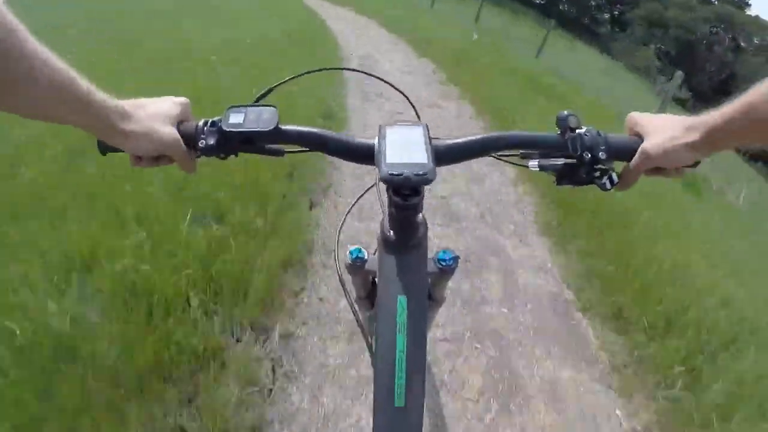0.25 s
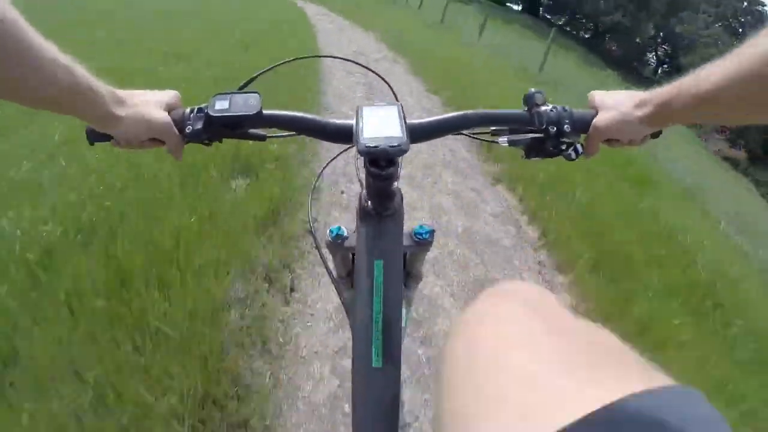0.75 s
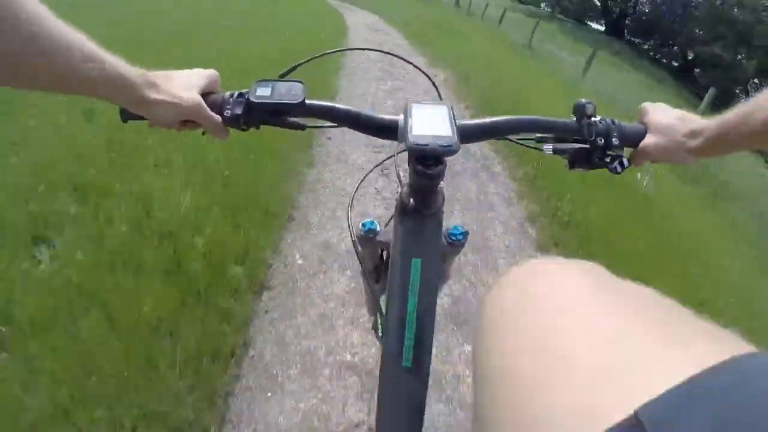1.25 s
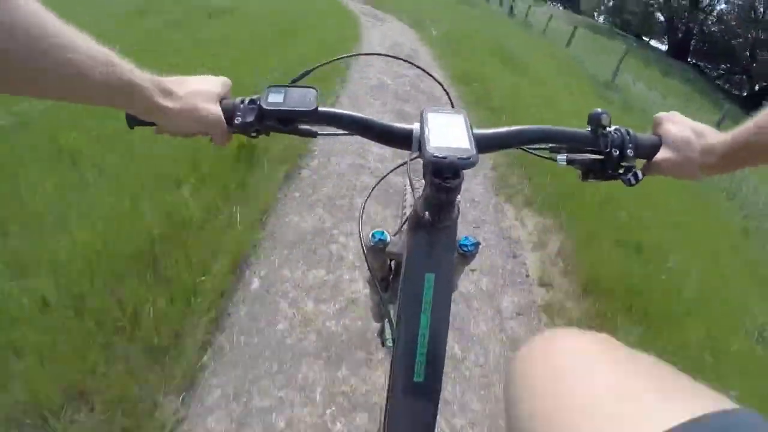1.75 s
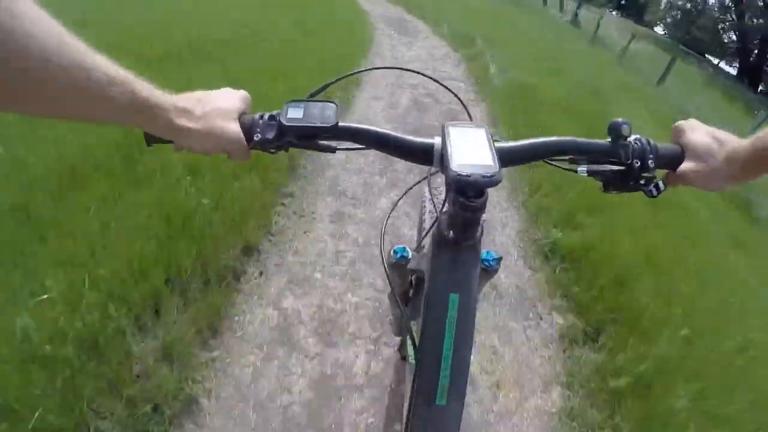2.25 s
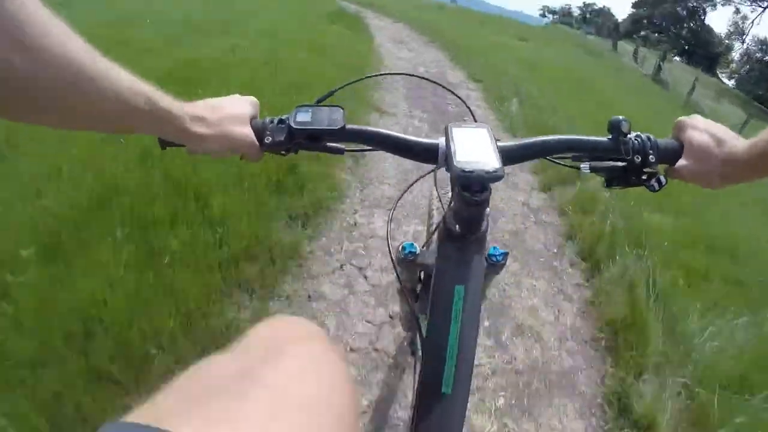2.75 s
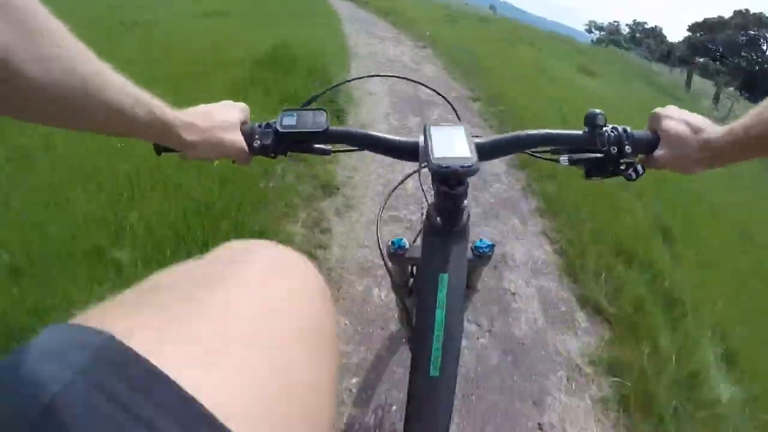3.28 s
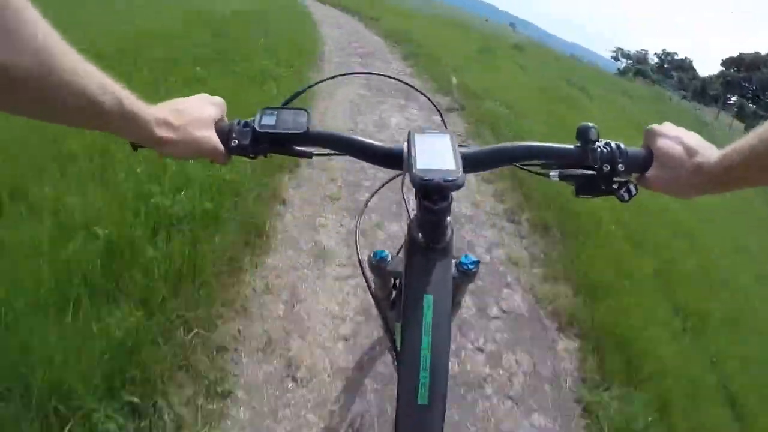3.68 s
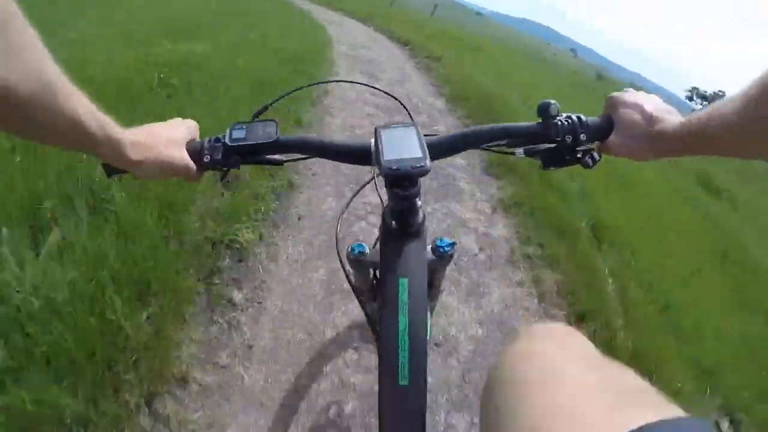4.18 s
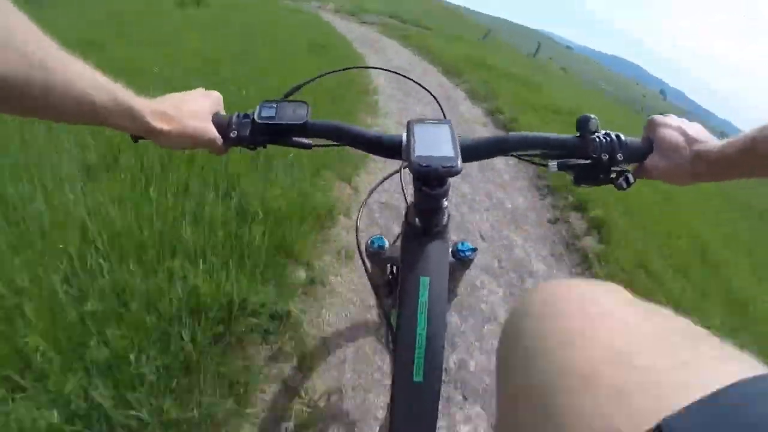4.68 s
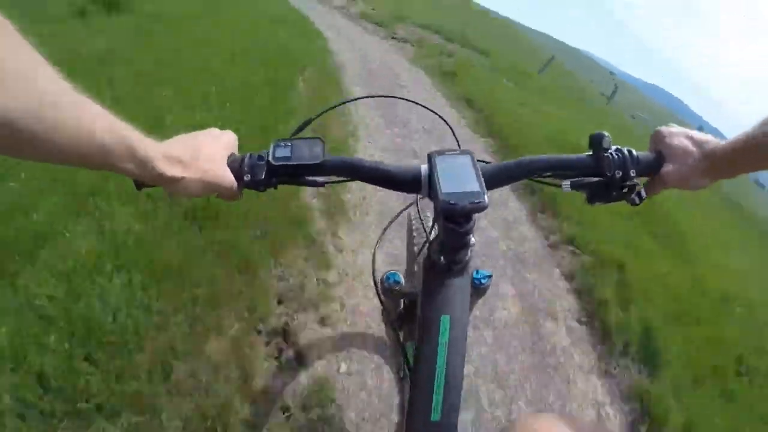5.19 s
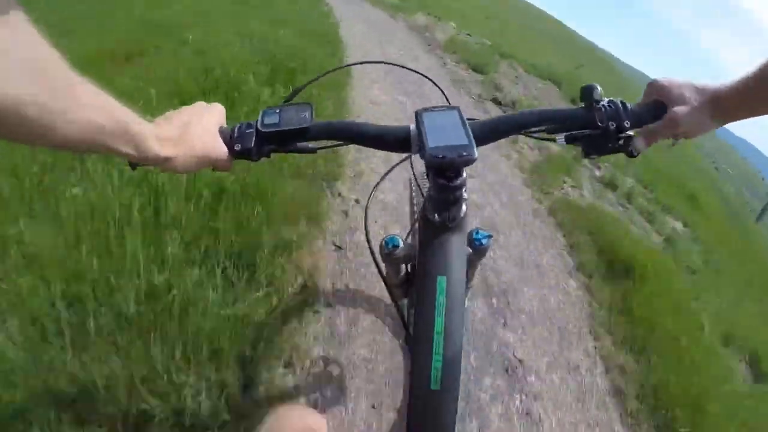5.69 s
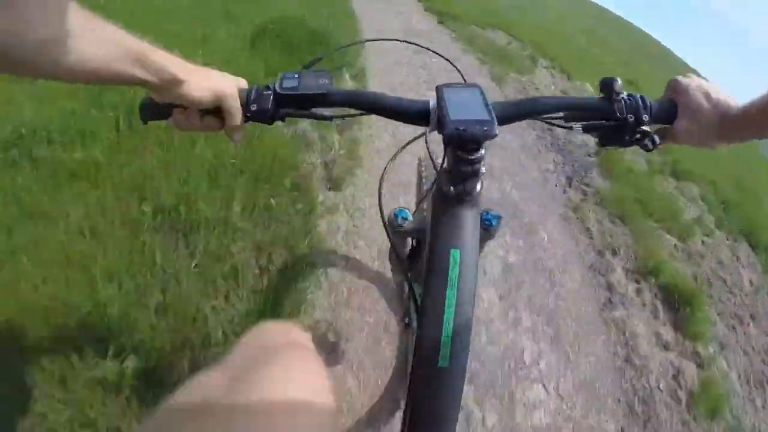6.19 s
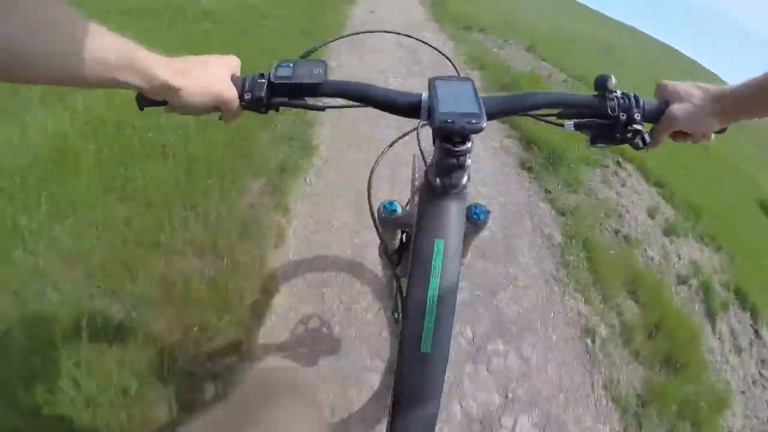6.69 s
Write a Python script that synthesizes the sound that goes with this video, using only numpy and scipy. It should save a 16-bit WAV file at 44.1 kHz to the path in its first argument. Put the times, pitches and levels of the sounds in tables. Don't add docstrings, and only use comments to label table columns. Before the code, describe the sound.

A mountain bike rolls over a gritty gravel trail, tyres crunching and stones knocking the frame while a chest-worn camera thumps and rumbles.

```python
import sys
import numpy as np
from scipy import signal
from scipy.fft import rfft, irfft, next_fast_len
from scipy.io import wavfile
from scipy.ndimage import uniform_filter1d

SR = 44100
rng = np.random.default_rng(int(sys.argv[2]) if len(sys.argv) > 2 else 0)


def volts_from_decibels(level):
    exponent = np.asarray(level, float) / 20
    return 10 ** exponent


def generate_wav(signal):
    frames = np.transpose(np.atleast_2d(signal))
    scaled = np.clip(frames, -1, 1) * 32767
    pcm = np.round(scaled).astype(np.int16)
    wavfile.write(sys.argv[1], SR, pcm)


N = 306048

# centre_s, level_db
CHIRPS = [(0.094, -75), (0.336, -73), (0.543, -73), (0.734, -73), (0.944, -76), (1.178, -74), (1.389, -74),
          (1.568, -71), (1.778, -72), (1.962, -76), (2.179, -71), (2.414, -74), (2.619, -74.5),
          (2.805, -75), (3.028, -84), (3.238, -74), (3.415, -72), (3.655, -71), (3.875, -72), (4.038, -72),
          (4.172, -77), (4.29, -72), (4.471, -71), (4.715, -70), (4.942, -74), (6.014, -78), (6.198, -78),
          (6.391, -71), (6.545, -72), (6.77, -75)]
CHIRP_HZ, CHIRP_S = 10580, .027
# centre_s, length_s, pitch_hz, level_db
NEAR_BUZZ = [
    (6.152, .05, 10020, -72),
    (6.152, .05, 10590, -73),
]
# pitch_hz, level_db (per Hz)
AIR_COLOUR = [(180, -48), (300, 1.5), (515, -15.5), (790, 0.5), (994, -13.5), (1470, -2.5), (2010, -7.5),
              (2450, -5), (3400, -20.5), (5940, -19), (7350, -27), (12200, -36), (14000, -60)]
AIR_DB = -51
# pitch_hz, level_db (per Hz)
MIC_HISS = [(6000, -30), (10000, -7), (13000, 0), (15200, -10)]
MIC_HISS_DB = -82.5
# pitch_hz, level_db (per Hz)
WOBBLE = [(4, 0), (8, 0.5), (16, 7), (28, 8.5), (40, -8), (70, -18.5), (140, -22), (300, -48), (700, -140)]
# centre_s, peak_db, half_length_s
LURCHES = [(0.05, -31, 0.064), (0.203, -29.5, 0.15), (0.283, -21, 0.044), (0.475, -19, 0.016),
           (0.613, -23, 0.084), (0.835, -25.5, 0.18), (1.287, -17.5, 0.037), (1.476, -20.5, 0.026),
           (1.791, -23, 0.031), (2.023, -23, 0.034), (2.232, -21.5, 0.086), (2.476, -24.5, 0.12),
           (2.96, -25.5, 0.19), (3.277, -19.5, 0.026), (3.728, -26.5, 0.33), (4.224, -16, 0.024),
           (4.47, -26, 0.11), (4.685, -21, 0.024), (4.945, -27.5, 0.2), (5.393, -27.5, 0.15),
           (5.422, -19.5, 0.023), (0.35, -28, 0.031), (2.471, -17, 0.016), (3.91, -39, 0.03),
           (6.033, -25.5, 0.02), (5.654, -25, 0.019), (5.776, -23, 0.025), (6.246, -26, 0.14),
           (6.541, -18, 0.03), (6.734, -25.5, 0.071)]
CALM_DB = -33.5
# centre_s, peak_db, direction (+1 outwards, -1 inwards)
THUMPS = [(0.314, -20, -1), (0.639, -20.5, 1), (0.963, -16.5, -1), (1.309, -17.5, -1), (1.632, -17, -1),
          (1.947, -20, -1), (2.284, -23.5, 1), (2.611, -18, 1), (2.935, -19, -1), (3.261, -16, -1),
          (3.588, -16.5, 1), (3.924, -31, -1), (4.25, -17, -1), (4.574, -19.5, -1), (4.902, -15.5, -1),
          (5.236, -19.5, 1), (5.557, -16, 1), (5.882, -18, -1), (6.215, -19, 1), (6.543, -23, 1),
          (6.868, -19.5, -1)]
# pitch_hz, width_hz, peak_db
THUD = [(110, 55, 0), (170, 80, -4), (225, 100, -9), (370, 90, -12)]
KNOCK = [(575, 85, -12.5), (647, 190, -10), (760, 70, 3.5), (890, 126, -12.5)]
CRACK = [(1470, 170, 0), (1670, 200, -5), (2220, 200, -3), (2480, 220, -3), (2980, 220, -18)]
TICK = [(3480, 1100, -4.5), (4197, 183, 0), (4630, 280, -0.5), (5600, 270, -8), (5910, 290, -2),
        (6570, 290, -11.5), (7800, 300, -14.5)]
SPARKLE = [(8950, 170, 0), (10200, 900, -10), (11700, 300, -4), (12750, 250, -7), (13500, 350, -14),
           (14900, 400, -15)]
GROUPS = [THUD, KNOCK, CRACK, TICK, SPARKLE]
# pitch_hz, width_hz, peak_db
CHIP_TOP = [(10680, 300, -1.5), (16400, 700, -14)]
# pitch_hz, width_hz, peak_db
LOOSE_THUD = [(109, 40, 1), (172, 64, -3), (230, 56, -8.5), (381, 106, -7.5)]
LOOSE_KNOCK = [(600, 330, -2.5), (817, 138, -1.5), (995, 160, -6.5)]
LOOSE_CRACK = [(1511, 167, 3), (1590, 224, -7), (2223, 160, -2), (2517, 91, -4), (3050, 67, -13.5)]
LOOSE_TICK = [(3460, 640, -8.5), (4130, 420, -8), (4486, 420, 1), (5620, 89, -4), (6000, 140, -5),
              (6530, 320, -18), (7200, 240, -18)]
# pitch_hz, width_hz, peak_db
HARD_CHIP = [(2300, 130, -3), (2550, 160, -6), (3250, 1300, -20), (4120, 240, -2.5), (4550, 700, -5),
             (6000, 390, -6.5), (6410, 290, -4), (7700, 450, -7.5), (9090, 270, -11.5), (10300, 1000, -25),
             (11750, 360, -20), (12700, 370, -19.5), (14500, 500, -24), (15600, 800, -28)]
CENTRES_HZ = [130, 700, 2000, 5200, 11000]
USUAL_DB = [-40, -52, -43, -48, -69]
# contact_ms, grains_per_s, size_spread_db, clumping_db, grit_level_db
CONTACT = [(0.087, 300, 2, 4, 5), (1, 100, 0.5, -2, -9), (1.4, 800, 4, 5, -3), (1.3, 500, 4, 5, -1),
           (1.7, 400, -1, -6, -51)]
# time_s, level_db
LOOSENESS = [(0.0, -51), (0.41, -51), (0.71, -52.5), (1.31, -50), (1.57, -52.5), (1.78, -52), (2.13, -50.5),
             (2.68, -51), (2.82, -53), (3.17, -51), (3.67, -53), (4.14, -50.5), (4.46, -52.5),
             (4.95, -51.5), (5.84, -50), (6.24, -52), (6.51, -50), (6.94, -51)]
# mean_db, looseness_share, lurch_share
ROLL = [(-48.5, 0.063, 0.027), (-53.5, 1.14, 0.12), (-64.5, 0.56, 0.34), (0.85, 1, 0.043)]
# start_s, thud_db
JOLTS = [(0.261, -25.5), (0.284, -21), (0.854, -31), (1.004, -24), (1.026, -30.5), (1.488, -27),
         (1.616, -24.5), (1.768, -31), (1.977, -24), (2.047, -26), (2.496, -20.5), (2.548, -27),
         (2.601, -21), (2.958, -26), (3.031, -24), (3.298, -25), (3.499, -28), (3.837, -27), (3.973, -23),
         (4.698, -21.5), (4.798, -24), (4.839, -23), (5.566, -26.5), (5.706, -22.5), (5.905, -24),
         (5.976, -20.5), (6.438, -22), (6.56, -19.5), (6.722, -27), (6.822, -23)]
# start_s, length_s, level_db
SCRAPES = [(0.199, 0.041, -46.5), (1.425, 0.032, -51), (2.616, 0.031, -43.5), (2.668, 0.043, -47),
           (2.727, 0.037, -47.5), (3.407, 0.038, -50), (3.654, 0.028, -45), (4.453, 0.073, -49),
           (4.649, 0.12, -46), (5.178, 0.034, -51), (5.342, 0.026, -48), (6.011, 0.03, -44.5),
           (6.25, 0.051, -50), (6.563, 0.046, -45.5), (6.761, 0.023, -45)]
# start_s, peak_db
PEBBLE_LOWS = [(0.12, -40), (0.261, -28), (1.169, -33), (1.488, -39), (1.713, -34), (2.046, -39),
               (2.178, -48), (2.261, -36), (2.321, -33), (2.421, -33), (2.567, -34), (2.613, -45),
               (3.223, -43), (4.322, -42), (4.576, -35), (5.091, -28.5), (5.198, -34), (5.345, -40),
               (5.878, -34), (5.974, -31), (6.103, -49), (6.268, -47), (6.329, -32), (6.512, -28),
               (6.819, -35), (6.867, -22)]
PEBBLE_KNOCKS = [(0.32, -39), (0.886, -40), (1.02, -39), (1.076, -35), (1.202, -39), (1.506, -38),
                 (1.979, -46), (2.047, -45), (2.155, -53), (2.423, -37), (2.481, -35), (2.872, -40),
                 (3.11, -51), (3.932, -40), (3.97, -39), (3.995, -40), (4.09, -48), (4.212, -36),
                 (4.577, -42), (4.918, -43), (5.091, -62), (5.255, -38), (5.341, -46), (5.517, -37),
                 (5.755, -41), (5.907, -42), (6.512, -39), (6.562, -39), (6.785, -45), (6.866, -38)]
PEBBLE_CRACKS = [(0.042, -43), (0.053, -41), (0.14, -39), (0.176, -35), (0.267, -43), (0.277, -38),
                 (0.317, -43), (0.611, -42), (0.767, -41), (0.798, -41), (1.039, -35), (1.101, -37),
                 (1.336, -48), (1.798, -45), (2.046, -43), (2.099, -39), (2.168, -34), (2.561, -42),
                 (3.106, -43), (3.564, -50), (3.665, -36), (3.702, -36), (4.106, -43), (4.2, -39),
                 (4.393, -47), (4.728, -43), (4.931, -44), (5.244, -33), (5.275, -43), (5.355, -36.5),
                 (5.508, -39), (5.574, -34), (5.642, -49), (5.663, -31), (5.761, -41), (5.886, -35),
                 (6.669, -44), (6.791, -43), (6.867, -58), (6.922, -41)]
# start_s, crack_db, tick_db
CHIPS = [(0.04, -52, -51), (0.14, -43, -43), (0.174, -44, -38.5), (0.181, -48, -52), (0.268, -39, -49),
         (0.535, -35, -45), (0.767, -44, -53), (0.803, -36, -53), (0.958, -46, -42), (1.156, -51, -43),
         (1.19, -35, -37), (1.209, -38, -38), (1.284, -32, -40), (1.447, -49, -44), (1.514, -48, -58),
         (1.525, -37, -52), (1.86, -46, -53), (1.967, -52, -57), (2.245, -35, -58), (2.344, -39, -45),
         (2.51, -51, -48), (2.603, -38, -43), (2.763, -39, -59), (2.989, -53, -44), (3.047, -49, -49),
         (3.103, -51, -50), (3.229, -33, -50), (3.394, -41, -59), (3.553, -47, -53), (3.861, -46, -46),
         (3.992, -38, -54), (4.31, -47, -47), (4.469, -37, -47), (4.601, -49, -49), (4.655, -36.5, -50),
         (4.928, -52, -47), (5.157, -43, -63), (5.277, -40, -46), (5.437, -55, -59), (5.757, -35, -43),
         (5.779, -47, -47), (5.785, -39, -46), (6.051, -56, -42), (6.198, -48, -53), (6.333, -51, -43),
         (6.438, -43, -37.5), (6.558, -48, -44), (6.697, -48, -43.5)]
# start_s, thud_db, knock_db, crack_db
BURIED = [(0.197, -22.5, -44, -79), (0.791, -20, -36, -44), (1.627, -20, -32, -38), (1.91, -18.5, -35, -41),
          (1.959, -22.5, -36, -35.5), (2.567, -30, -39.5, -43), (2.63, -57, -38, -39),
          (3.556, -26, -38, -42), (3.655, -20.5, -50, -64), (3.695, -25, -43.5, -50),
          (3.768, -17.5, -38.5, -41), (3.816, -21, -43, -47), (3.9194, -12.5, -30.5, -33),
          (4.471, -24, -46, -41), (4.512, -36, -43, -44), (4.677, -31, -37.5, -36.5),
          (4.717, -29, -40, -37.5), (4.843, -31, -38, -36), (4.919, -23, -39, -41), (5.393, -29, -43, -45),
          (5.474, -27, -41.5, -46), (5.642, -15.5, -31.5, -39), (5.686, -28, -41, -39),
          (5.729, -24.5, -42, -42), (6.031, -44, -46, -52), (6.329, -33, -39, -41),
          (6.663, -25.5, -42, -58), (6.771, -31, -38, -43), (6.867, -35, -45, -65), (6.935, -30, -34, -34)]
# start_s, knock_db, crack_db, tick_db
LOOSE = [(0.168, -89, -42, -40.5), (0.3, -85, -65, -41.5), (0.47, -68, -41, -42), (0.621, -38.5, -32, -41),
         (0.886, -53, -38.5, -60), (0.911, -34.5, -28.5, -48), (1.052, -38, -20.5, -29.5),
         (1.524, -64, -41.5, -52), (1.866, -34, -26, -42.5), (2.189, -68, -40.5, -42),
         (2.324, -42.5, -42, -52), (2.497, -45, -39.5, -36), (2.755, -28.5, -17, -26.5),
         (2.873, -47.5, -39, -51), (3.015, -67, -41, -44), (3.111, -64, -40.5, -50), (3.229, -48, -46, -50),
         (3.355, -33.5, -26, -39.5), (3.64, -61, -43, -35.5), (3.676, -47, -40, -47),
         (3.724, -55, -39.5, -43.5), (3.939, -63, -37, -44), (4.484, -45, -36, -39),
         (5.236, -36, -30, -36.5), (5.655, -38, -61, -36.5), (5.766, -43, -45, -50),
         (5.958, -67, -42, -37.5), (6.429, -45, -44, -34.5), (6.676, -41.5, -36, -85),
         (6.787, -47, -50, -53)]
# start_s, tilt_db (per octave)
LOOSE_TILT = [
    (.623, -4),
    (1.052, 7.5),
    (1.865, -8),
    (2.755, -8),
    (3.355, -1),
    (6.677, -12),
    (1.524, 13),
]
# start_s, crack_db, tick_db, sparkle_db
FLUNG = [(.489, -43, -39.5, -56), (0.602, -40, -42.5, -58), (.687, -41, -41, -57),
         (1.156, -121, -46.5, -50), (1.173, -44, -42, -54), (1.26, -35, -37.5, -54),
         (1.404, -50, -39.5, -48), (1.58, -55, -48, -52), (1.616, -46, -46, -65), (1.729, -63, -52, -60),
         (1.817, -55, -49, -59), (2.082, -47.5, -37.5, -51), (2.147, -51, -46, -58),
         (3.001, -41, -36.5, -51), (4.16, -39.5, -38, -55), (4.342, -50, -42, -56), (4.697, -46, -39, -68),
         (4.836, -42, -43.5, -60), (5.049, -63, -48, -59), (5.089, -37, -42, -59), (5.257, -49, -44, -62),
         (5.743, -43, -46, -54), (5.787, -54, -44, -61), (5.983, -52, -39.5, -52), (6.045, -47, -42, -57),
         (6.284, -53, -46, -54), (6.438, -53, -57, -52), (6.56, -48, -50, -55), (6.895, -66, -45, -53),
         (6.936, -48, -42, -44.5)]
# pitch_hz, width_hz, level_db
CASE = [(476, 110, -1.5), (757, 67, -3), (1038, 38, 1), (2996, 270, 4.5), (3890, 460, 3.5), (7950, 160, -2),
        (5900, 250, 2), (7030, 230, 2), (10100, 660, 1), (11400, 340, 0.5), (13200, 1100, 2),
        (15000, 400, -8)]


def evened(x):
    return x / np.sqrt(np.mean(x ** 2) + 1e-20)


def add(mix, start_s, sound):
    part = mix[max(round(start_s * SR), 0):][:len(sound)]
    part += sound[:len(part)]


def coloured(points):
    f, db = np.transpose(points)
    size = next_fast_len(N)
    hz = np.fft.rfftfreq(size, 1 / SR)
    gain = volts_from_decibels(np.interp(np.log(hz + 1), np.log(f + 1), db))
    return evened(irfft(rfft(rng.standard_normal(N), size) * gain, size)[:N])


def drift(per_s):
    span = int(SR / per_s)
    return evened(uniform_filter1d(uniform_filter1d(rng.standard_normal(N), span), span))


def ring(x, hz, width, db):
    r, turn = np.exp(-np.pi * width / SR), 2 * np.pi * hz / SR
    return volts_from_decibels(db) * width * signal.lfilter([r * np.sin(turn)], [1, -2 * r * np.cos(turn), r * r], x)


def lurch_db():
    t = np.arange(0, N + 64, 64) / SR
    power = volts_from_decibels(2 * CALM_DB)
    for centre_s, db, half_s in LURCHES:
        power = power + volts_from_decibels(2 * db) * np.exp(-((t - centre_s) / half_s) ** 2)
    return np.interp(np.arange(N) / SR, t, 10 * np.log10(power))


def ride(column):
    mean_db, loose, lurch = ROLL[column]
    gravel_db = np.interp(np.arange(N) / SR, *np.transpose(LOOSENESS))
    rock_db = lurch_db()
    return volts_from_decibels(mean_db + loose * (gravel_db - gravel_db.mean()) + lurch * (rock_db - rock_db.mean()))


def insects(rough=.4):
    out = np.zeros(N)
    chirps = [(s, CHIRP_S, CHIRP_HZ, db) for s, db in CHIRPS]
    for centre_s, length_s, hz, db in chirps + NEAR_BUZZ:
        t = np.arange(round(length_s * SR)) / SR
        flutter = 1 + rough * evened(uniform_filter1d(rng.standard_normal(len(t)), 130))
        whistle = np.sin(2 * np.pi * hz * t) * signal.windows.tukey(len(t), .3)
        add(out, centre_s - length_s / 2, volts_from_decibels(db) * flutter * whistle)
    return out


def air():
    gusts = volts_from_decibels(AIR_DB - 4.0 + 1.4 * drift(per_s=17.6))
    return ride(column=3) * gusts * coloured(AIR_COLOUR)


def shake():
    wobble = coloured(WOBBLE)
    envelope = abs(signal.hilbert(wobble, next_fast_len(N))[:N])
    steady = wobble / (uniform_filter1d(envelope, 3000) + 0.78)
    return volts_from_decibels(lurch_db()) * evened(steady)


def thumps(hz=62, rise_hz_s=900, before_s=0.0032, after_s=0.0073):
    t, out = np.arange(-2400, 2400) / SR, np.zeros(N)
    fade = np.exp(-.5 * (t / np.where(t < 0, before_s, after_s)) ** 2)
    for (centre_s, db, way), speed in zip(THUMPS, rng.uniform(0.63, 1.35, len(THUMPS))):
        swing = np.sign(way) * np.cos(2 * np.pi * (hz * speed * t + rise_hz_s * t ** 2 / 2))
        add(out, centre_s + t[0], volts_from_decibels(db) * swing * fade)
    return out


def jolts(contact_ms=1.8, vary_db=4.0):
    out, u = np.zeros(N), np.arange(2000) * 1000 / SR / contact_ms
    shove = u * np.exp(-2 * u)
    for (start_s, db), draw in zip(JOLTS, rng.standard_normal((len(JOLTS), len(THUD) + 1))):
        sound = sum(volts_from_decibels(vary_db * draw[k]) * ring(shove, *mode) for k, mode in enumerate(THUD))
        add(out, start_s, np.sign(draw[-1]) * volts_from_decibels(db) * sound / abs(sound).max())
    return out


def scrapes(gain_db=-2.5, upper_db=-7):
    force, noise = np.zeros(N), rng.standard_normal(N)
    for start_s, length_s, db in SCRAPES:
        add(force, start_s, volts_from_decibels(db + gain_db) * signal.windows.tukey(round(length_s * SR), .4))
    low = evened(sum(ring(noise, *mode) for mode in KNOCK[2:3]))
    high = evened(sum(ring(noise, *mode) for mode in CRACK))
    return force * (low + volts_from_decibels(upper_db) * high)


def pebbles(vary_db=4, crumble_ms=2.6, soft=5.7):
    out, ms = np.zeros(N), np.arange(900) * 1000 / SR
    chip_cracks = [(s, db) for s, db, _ in CHIPS]
    chip_ticks = [(s, db) for s, _, db in CHIPS]
    kinds = [(PEBBLE_LOWS, THUD[2:], -2), (PEBBLE_KNOCKS, KNOCK, -2), (PEBBLE_CRACKS, CRACK, -3),
             (chip_cracks, CRACK, -4), (chip_ticks, TICK, -2)]
    for rows, modes, gain_db in kinds:
        draws = rng.standard_normal((len(rows), len(ms) + len(modes)))
        for (start_s, db), draw in zip(rows, draws):
            push = draw[len(modes):] * np.exp(-ms / crumble_ms)
            sound = 0
            for k, (hz, width, peak_db) in enumerate(modes):
                swell = ring(push, hz, soft * width, 0)
                sound = sound + volts_from_decibels(vary_db * draw[k]) * ring(swell, hz, width, peak_db)
            add(out, start_s, volts_from_decibels(db + gain_db) * sound / abs(sound).max())
    return out


def hard_chip(soft=2.9, again_ms=1.7, again=0.83, crumble_db=-24, crumble_ms=3.1):
    out, ms = np.zeros(N), np.arange(1500) * 1000 / SR
    push = volts_from_decibels(crumble_db) * rng.standard_normal(len(ms)) * np.exp(-ms / crumble_ms)
    push[0] += 1
    push[int(again_ms * SR / 1000)] += again
    sound = 0
    for k, (hz, width, db) in enumerate(HARD_CHIP):
        sound = sound + (-1) ** k * ring(ring(push, hz, width, db), hz, soft * width, 0)
    add(out, 5.8506, volts_from_decibels(-19.5) * sound / abs(sound).max())
    return out


def grit(own=1.0, crumble_ms=1.76):
    clumps, out = np.tanh(drift(per_s=64)), np.zeros(N)
    fade = np.exp(-1000 / (crumble_ms * SR))
    for modes, (_, per_s, spread_db, clump_db, db), column in zip(GROUPS, CONTACT, (0, 1, 1, 2, 2)):
        if modes is not SPARKLE:
            chance = rng.random(N)
            size = -np.log(rng.random(N) + 0.039)
            patches = drift(per_s=110)
        grains = (chance < per_s / SR) * volts_from_decibels(spread_db * size + clump_db * clumps + 2.13 * patches)
        crumbs = np.sqrt(signal.lfilter([1], [1, -fade], grains ** 2))
        shared = rng.standard_normal(N)
        rung = sum(ring(crumbs * (shared + own * rng.standard_normal(N)), *mode) for mode in modes)
        out += volts_from_decibels(db) * ride(column) * evened(rung)
    return out


def stone_rows(dull_db=-14, over_db=6.5, quiet_db=-74, thin_db=-72, light_db=-50, spark_db=-24):
    buried = [(s, thud, knock, crack, crack + dull_db, quiet_db) for s, thud, knock, crack in BURIED]
    loose = [(s, knock + over_db, knock, crack, tick, tick + spark_db) for s, knock, crack, tick in LOOSE]
    flung = [(s, light_db, thin_db, crack, tick, spark) for s, crack, tick, spark in FLUNG]
    return buried + loose + flung


def stones(gain_db=1.5, lean=1.0, bounce=0.45, bounce_ms=1.6, crumble_db=-33, crumble_ms=7.8,
           thud_ms=1.36, soft=4.6, spike=10.0):
    out, ms = np.zeros(N), np.arange(2000) * 1000 / SR
    rows = stone_rows()
    draws = rng.standard_normal((len(rows), 2002))
    plain = GROUPS[:4] + [SPARKLE + CHIP_TOP]
    freed = [LOOSE_THUD, LOOSE_KNOCK, LOOSE_CRACK, LOOSE_TICK, SPARKLE]
    bodies = [plain] * len(BURIED) + [freed] * len(LOOSE) + [plain] * len(FLUNG)
    for (start_s, *levels_db), draw, body in zip(rows, draws, bodies):
        for modes, (contact_ms, *_), db in zip(body, CONTACT, levels_db):
            if modes is THUD:
                push = ms / thud_ms * np.exp(-2 * ms / thud_ms)
                push = push + spike * (abs(ms - .5 * thud_ms) < 500 / SR)
            else:
                shove = ms / contact_ms * np.exp(-2 * ms / contact_ms)
                push = draw[2:] * (.3 * shove + volts_from_decibels(crumble_db) * np.exp(-ms / crumble_ms))
                push[int(contact_ms * 20)] += 1
            if modes is TICK:
                push[int(SR / 1000 * bounce_ms * (1 + .5 * abs(draw[1])))] += bounce
            hz, width, peak_db = np.transpose(modes)
            hz = hz * (1 + .006 * draw[0])
            excess_db = np.subtract(levels_db, USUAL_DB)
            peak_db = peak_db + lean * np.interp(np.log(hz), np.log(CENTRES_HZ), excess_db)
            if modes is LOOSE_CRACK:
                tilt_db = sum(tilt for at, tilt in LOOSE_TILT if abs(at - start_s) < .01)
                peak_db += np.log2(hz / CENTRES_HZ[2]) * tilt_db
            flip = 1 if modes is THUD else -1
            sound = 0
            for k, (f, w, g) in enumerate(zip(hz, width, peak_db)):
                drive = push if hz[0] < 300 else ring(push, f, soft * w, 0)
                sound = sound + flip ** k * ring(drive, f, w, g)
            add(out, start_s, volts_from_decibels(db + gain_db) * sound / abs(sound).max())
    return out


def scene():
    mount = shake() + thumps()
    tyres = jolts() + scrapes() + pebbles() + hard_chip() + grit() + stones()
    return (insects() + air() + mount + tyres)[None]


def case(x):
    f = abs(np.fft.fftfreq(8192, 1 / SR))
    bumps_db = sum(db * np.exp(-((f - hz) / width) ** 2) for hz, width, db in CASE)
    log_gain = np.log(volts_from_decibels(bumps_db))
    impulse = np.fft.ifft(np.exp(np.conj(signal.hilbert(log_gain)))).real[:4096]
    return signal.oaconvolve(x, impulse)[:N]


def thin_treble(x):
    hz, _, z = signal.stft(x, SR, nperseg=1024)
    top = hz > 12800
    patch = uniform_filter1d(uniform_filter1d(abs(z) ** 2, size=5, axis=1), size=4, axis=0)
    whole = patch[top].mean(0) + 1e-30
    usual = np.median(whole)
    chance_db = 4 * evened(uniform_filter1d(rng.standard_normal(len(whole)), size=6))
    patch *= np.maximum(1 / whole, 1 / (2 * usual)) * volts_from_decibels(chance_db)
    weak = patch < np.quantile(patch, .36, axis=1, keepdims=True)
    weak |= (hz[:, None] > 15250) & (whole < 12 * usual)
    return signal.istft(z * ~(weak & top[:, None]), SR, nperseg=1024)[1][None, :N]


def low_pass(x):
    return signal.sosfilt(signal.butter(12, 16600, fs=SR, output="sos"), x)


def record(dry):
    heard = case(dry[0]) + volts_from_decibels(MIC_HISS_DB) * coloured(MIC_HISS)
    limited = signal.oaconvolve(heard, signal.firwin(255, 16500, fs=SR), "same")
    return low_pass(thin_treble(limited))


dry = scene()
out = record(dry)
generate_wav(out)
```